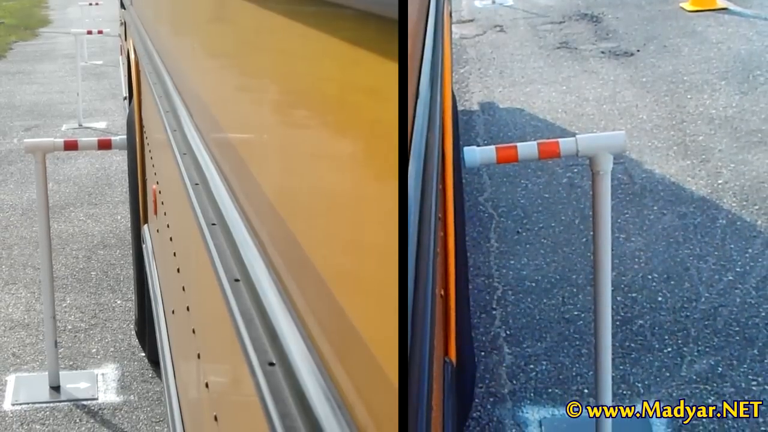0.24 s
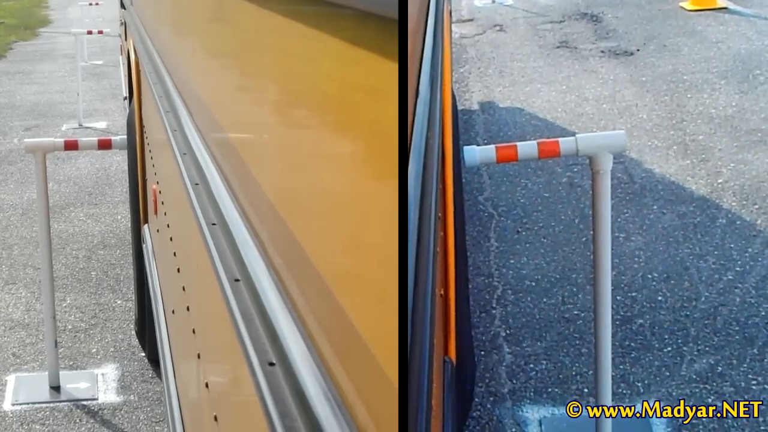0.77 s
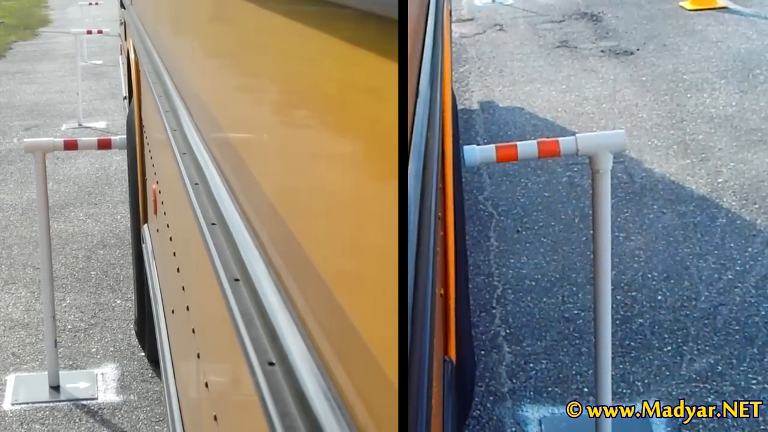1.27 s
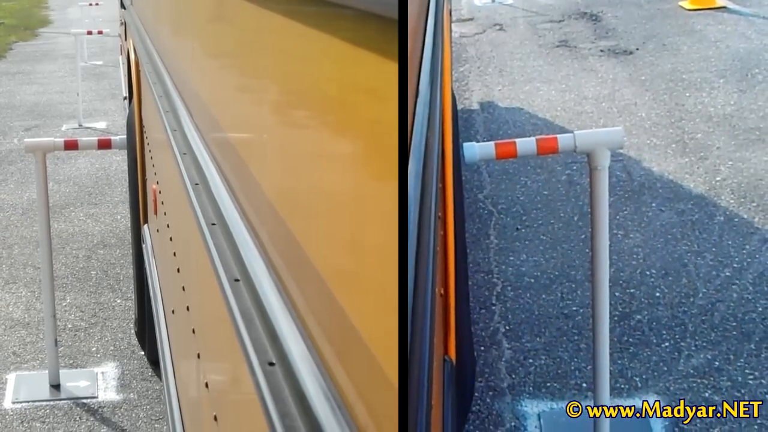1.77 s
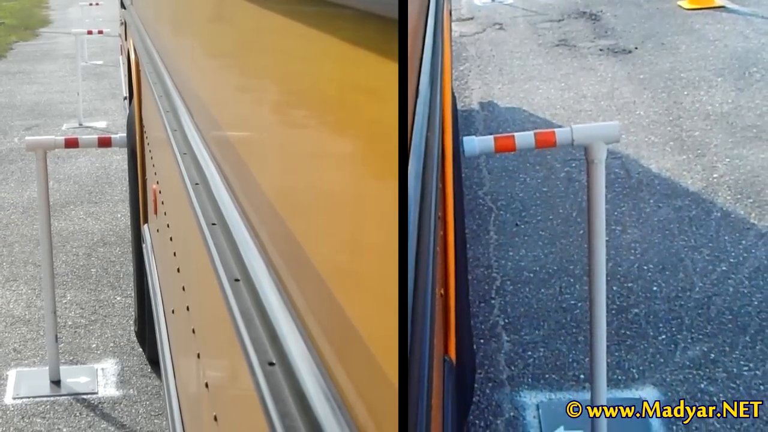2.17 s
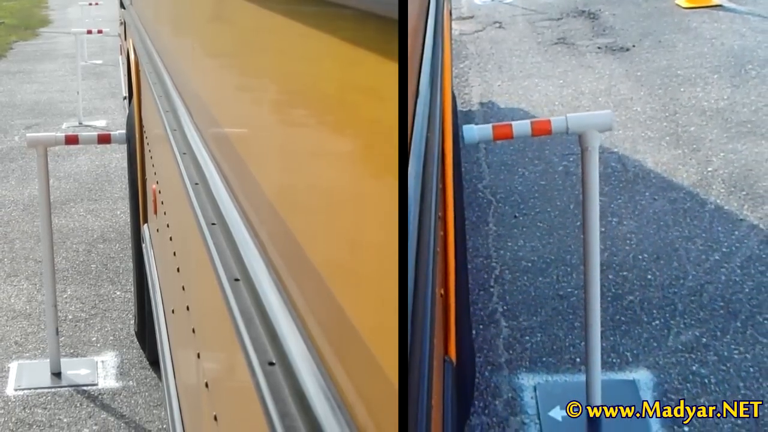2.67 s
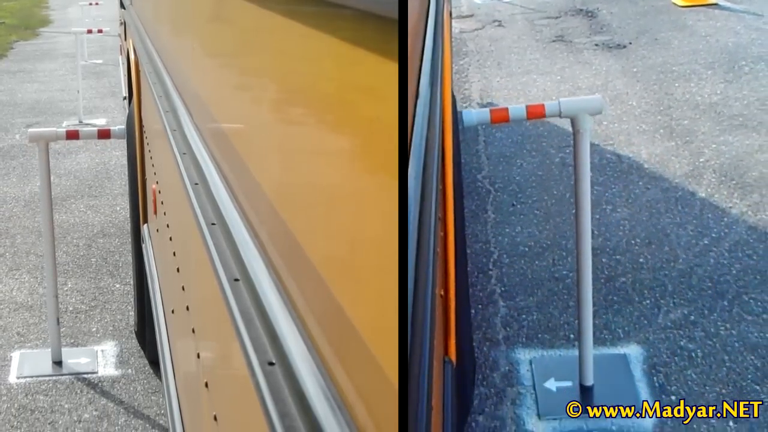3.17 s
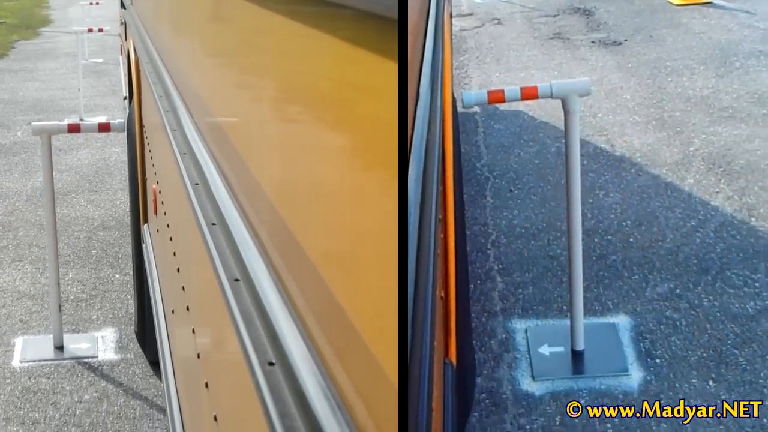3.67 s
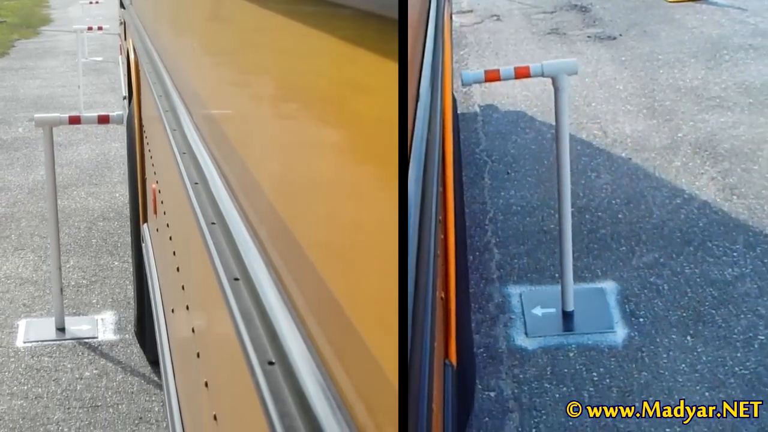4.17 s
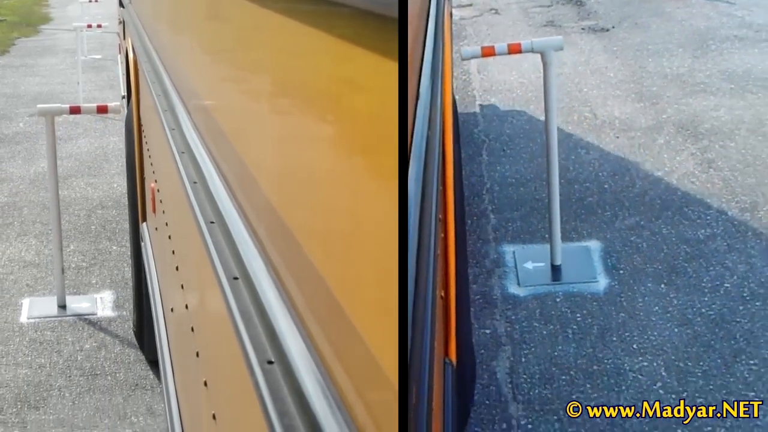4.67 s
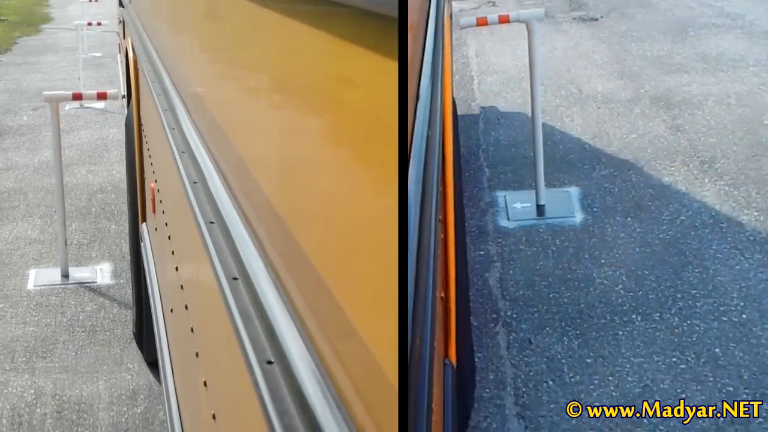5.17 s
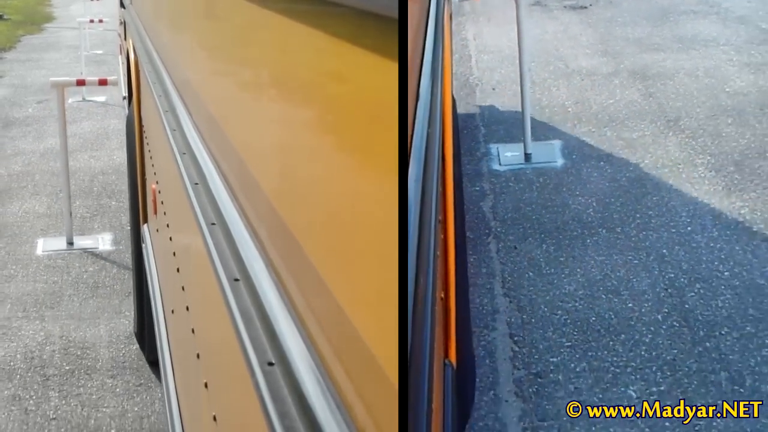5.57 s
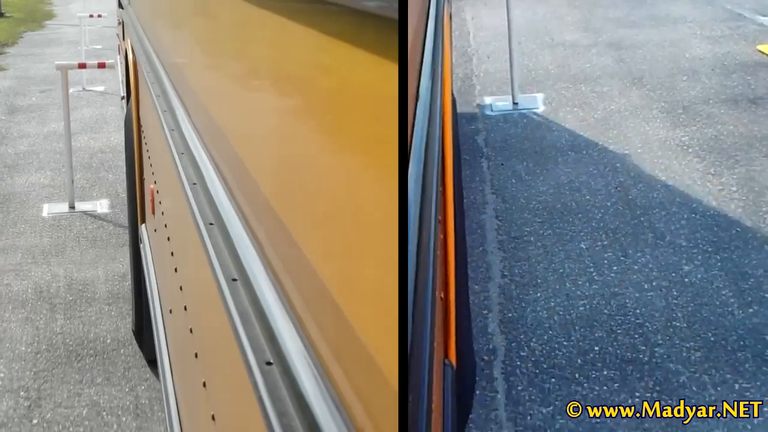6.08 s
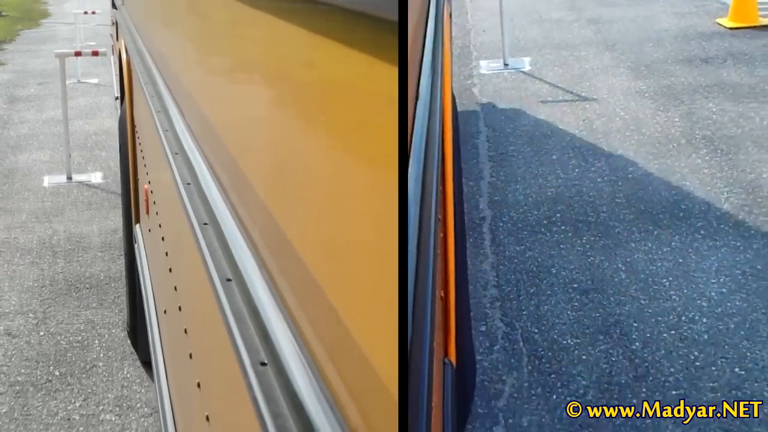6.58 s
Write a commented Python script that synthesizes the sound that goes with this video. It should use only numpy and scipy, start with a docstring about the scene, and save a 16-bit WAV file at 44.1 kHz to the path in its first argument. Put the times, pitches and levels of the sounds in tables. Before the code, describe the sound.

A bus diesel idles with a knocking clatter, its two-tone horn toots four times, air puffs, then the engine revs with a roar.

```python
"""A diesel school bus idles and knocks, gives four toots of its two-tone horn, then revs up with a roar.
Air puffs from the brake valve around the horn's end and again just before the bus pulls slowly forward.
Noise pulsed by the firings makes the engine, with compressor knocks once a turn and hums tied to the crank.
The horns are sums of gliding partials with echoes; turbocharger and brake air are coloured noise.
The recorder ducks the mix at the loud horn and lets it creep back up."""
import sys
import numpy as np
from scipy import signal
from scipy.fft import rfft, irfft
from scipy.io import wavfile
from scipy.ndimage import uniform_filter1d

SR = 44100
rng = np.random.default_rng(int(sys.argv[2]) if len(sys.argv) > 2 else 0)


def wav_record(signal):
    """Record a signal, one row per channel, as 16-bit PCM in the file named by sys.argv[1]."""
    frames = np.transpose(np.atleast_2d(signal))
    bounded = np.clip(frames, -1, 1)
    # unit amplitude maps onto the largest positive 16-bit level
    quanta = np.round(bounded * 32767).astype(np.int16)
    wavfile.write(sys.argv[1], SR, quanta)


N = 301203
T = np.arange(N) / SR
HZ = np.fft.rfftfreq(N, 1 / SR)

# crank speed: (time [s], speed [multiple of idle])
CRANK_SPEED = [(4.45, 1.0), (4.73, 1.44), (5.0, 1.6), (5.35, 1.63), (5.5, 1.54), (5.88, 1.21), (6.83, 1.22)]
# accelerator pushes: (press [s], release [s], depth before the pedal lag [0-1])
PEDAL_PUSHES = [(4.477, 5.393, 0.88), (6.12, 6.634, 0.83)]
# engine noise at idle: (frequency [Hz], relative level [dB per Hz])
IDLE_ROAR_COLOUR = [(50, -24.5), (110, -14.5), (180, -6), (230, -1.5), (300, -2), (400, -3.5), (540, -7.5),
                    (820, -7.5), (1300, -14), (1700, -22), (2200, -27), (2700, -36), (4000, -50.5),
                    (9000, -64.5)]
# engine roar under load: (frequency [Hz], relative level [dB per Hz])
LOAD_ROAR_COLOUR = [(50, -23), (95, -17), (135, 1), (190, -4), (260, -1), (390, -1), (480, -4.5), (820, -6),
                    (1300, -17.5), (2000, -31.5), (2700, -42.5), (4000, -47), (9000, -62)]
# hiss of the engine bay: (frequency [Hz], relative level [dB per Hz])
BAY_HISS_COLOUR = [(1500, -8.5), (2800, 2.5), (4800, 3), (6200, -6), (9500, -9), (12000, -12.5),
                   (15500, -16.5)]
# low rumble of exhaust and air round the body: (frequency [Hz], relative level [dB per Hz])
RUMBLE_COLOUR = [(22, -20.5), (45, -5.5), (62, -2.5), (85, 6), (105, 8), (130, 4), (170, 2.5), (300, -33.5),
                 (3000, -110)]
# turbocharger air: (frequency [Hz], relative level [dB per Hz])
TURBO_COLOUR = [(3000, -13.5), (5400, 1.5), (7000, -2), (10000, -8), (11700, -1), (13000, -16),
                (15500, -21)]
# brake air: (frequency [Hz], relative level [dB per Hz])
BRAKE_AIR_COLOUR = [(1000, -2), (2200, 5), (4500, 1), (6500, 0), (7800, -5), (9500, -2), (12000, -1),
                    (15500, -10)]
# base strength of the three firings in a turn: (level [dB])
FIRING_STRENGTHS = [-2, 2, -1]
# body panel resonances: (frequency [Hz], width [Hz], boost [dB])
PANEL_RESONANCES = [(224, 29, 3), (361, 16, 3.5), (553, 12, 3), (796, 3.6, 7)]
# brake valve puffs: (open [s], time open [s], level [dB])
BRAKE_PUFFS = [(1.205, 0.087, -42), (1.275, .065, -38.5), (4.085, .055, -36.5)]
# horn button, the third toot with a faint first touch: (press [s], release [s], level [dB])
HORN_PRESSES = [(0.284, 0.483, 1.4), (0.817, 0.881, -1.17), (1.03, 1.042, -15), (1.045, 1.083, -4.5),
                (1.401, 1.48, -1.02)]
# low horn partials: (multiple of pitch, level before sag [dB], extra while starting [dB])
LOW_HORN_PARTIALS = [(1, -7, 4), (1.99, -6, 2), (3, -24.5, 0), (4, -7.5, -14), (5.1, -15.5, -17),
                     (5.9, -32, 1), (6.9, -41.5, -1.5), (8, -46, -1), (10.05, -54.5, 0), (12, -56, -6),
                     (14, -60.5, 8), (16, -58, 6), (21.8, -62.5, 2.5), (35, -68, 5)]
# high horn partials: (multiple of pitch, level before sag [dB], extra while starting [dB])
HIGH_HORN_PARTIALS = [(1, -11.5, 11.5), (2, 0, 2.5), (2.9, -7, 4), (4.04, -10.5, -7.5), (5.07, -26.5, -5.5),
                      (6, -40.5, 3.5), (7, -40, -5.5), (8, -45, 6.5), (9, -43, -1), (10, -45.5, -7.5),
                      (12, -53, 6), (13, -51.5, -4), (17, -55, 3), (21, -63, 6.5), (28.8, -66.5, -8)]
# ring of the yard: (frequency [Hz], time to fall 60 dB [s])
YARD_DECAY = [(400, 0.25), (1000, 0.31), (2000, 0.25), (8000, 0.3)]
# noise the microphones do not share: (frequency [Hz], level against the shared part [dB])
UNSHARED_NOISE = [(25, -2), (45, -8), (80, -15), (150, -20), (300, -24), (1000, -23), (2000, -13),
                  (3000, -2), (6000, 0), (12000, 1)]
# stereo balance: (frequency [Hz], left over right [dB])
STEREO_BALANCE = [(100, -.4), (700, -.5), (1100, -.3), (2200, -3), (4500, 0), (12000, 1.1)]

IDLE_HZ = 13.35  # crank turns a second
EDGE_HZ = 15850  # upper band limit of the recorder
PEDAL_LAG_S = 0.063
# revs here are crank speed above idle, in multiples of idle
IDLE_DB, DB_PER_REV, PEDAL_DB = -18.5, 7, 2.5
# the gearbox takes up the load over the first revs
FULL_LOAD, TAKE_UP_REVS, TAKE_UP_S = 0.79, 0.22, 0.07
# the rumble thins with revs, and swells when the pedal makes the engine labour at low revs
RUMBLE_DB, RUMBLE_DB_PER_REV = -25, -4.5
LABOUR_DB, LABOUR_REVS, LABOUR_WIDTH = 7.5, 0.27, 0.17
# the turbocharger rushes above a threshold of revs and grows as it spools up
TURBO_DB, TURBO_FROM_REVS, TURBO_KNEE_REVS = -58.5, 0.32, 0.05
SPOOL_S, SPOOL_DB_PER_REV = 0.55, 12.5
PUFF_RISE_S, PUFF_FADE_DB_PER_S = 0.034, 130
HORN_SAG_DB_PER_S = 26


def gain_of(db):
    """Decibels to amplitude."""
    return 10 ** (np.asarray(db) / 20)


def evened(x):
    """Scales to an rms of 1."""
    return x / np.sqrt(np.mean(x ** 2) + 1e-20)


def curve(rows):
    """A control at every sample, drawn straight between its points."""
    return np.interp(T, *np.transpose(rows))


def read(points, hz):
    """A spectrum table read on a log-frequency axis."""
    f, value = np.transpose(points)
    return np.interp(np.log(hz + 1), np.log(f + 1), value)


def drift(hz):
    """Random wander of rms 1, mostly slower than hz."""
    return evened(irfft(rfft(rng.standard_normal(N)) * np.exp(-(HZ / hz) ** 2), N))


def lagged(x, seconds):
    """Follows a control with inertia."""
    r = np.exp(-1 / (seconds * SR))
    return signal.lfilter([1 - r], [1, -r], x)


def delayed(x, seconds):
    """The same sound a little later; the delay may vary with frequency."""
    return irfft(rfft(x) * np.exp(-2j * np.pi * HZ * seconds), N)


def panels(hz):
    """Gain of the bus body at a frequency: each panel booms near its resonance."""
    boost_db = sum(db / (1 + ((hz - f) / width) ** 2) for f, width, db in PANEL_RESONANCES)
    return gain_of(boost_db)


def noise(spectrum, drive=1):
    """Turbulence, pulsed by drive and coloured by the body, as the two microphones hear it."""
    mid, side = rfft(rng.standard_normal((2, N)) * drive)
    side = side * gain_of(read(UNSHARED_NOISE, HZ))
    colour = gain_of(read(spectrum, HZ)) * panels(HZ)
    return evened(irfft(np.array([mid + side, mid - side]) * colour, N))


def stroke(cycles, rise, fall):
    """A quick rise and slower fall in every cycle; rise and fall are in cycles."""
    age = cycles % 1
    return evened((1 - np.exp(-age / rise)) * np.exp(-age / fall))


def ticks(turns, at, ring_hz, width_hz, fall):
    """One dull metallic knock a turn: a decaying noise burst through a resonance; at and fall in turns."""
    burst = rng.standard_normal(N) * np.exp(-((turns - at) % 1) / fall)
    b, a = signal.iirpeak(ring_hz, ring_hz / width_hz, fs=SR)
    once = signal.lfilter(b, a, burst)
    return evened(signal.lfilter(b, a, once))


def crank():
    """Crank speed in turns a second, and the turns made so far."""
    speed = IDLE_HZ * curve(CRANK_SPEED) / CRANK_SPEED[0][1]
    return speed, np.cumsum(speed) / SR


def driving():
    """Revs above idle, the push on the pedal, and the load (0-1) that the gearbox takes up."""
    revs = curve(CRANK_SPEED) / CRANK_SPEED[0][1] - 1
    push = sum(depth * ((T >= press) & (T < release)) for press, release, depth in PEDAL_PUSHES)
    load = lagged(FULL_LOAD * np.tanh(revs / TAKE_UP_REVS), TAKE_UP_S)
    return revs, lagged(push, PEDAL_LAG_S), np.clip(load, 0, 1)


def yard(x):
    """Scattered echoes from asphalt and buildings, each band dying at its own speed."""
    taps = rng.standard_normal((2, SR)) * (rng.random(SR) < 0.05)
    # left and right share most of their echoes
    taps[1] = (2 * taps[0] + taps[1]) / np.sqrt(5)
    hz, t, z = signal.stft(taps, SR, nperseg=256)
    decay = gain_of(-60 * t / read(YARD_DECAY, hz)[:, None])
    tail = signal.istft(z * decay * (t > 0.015), SR, nperseg=256)[1]
    return signal.fftconvolve(x[None], tail / np.linalg.norm(tail[0]), axes=1)[:, :N]


def turbocharger():
    """Air rushes through the turbocharger while the revs are high."""
    revs, _, _ = driving()
    blowing = (1 + np.tanh((revs - TURBO_FROM_REVS) / TURBO_KNEE_REVS)) / 2
    spool_db = SPOOL_DB_PER_REV * lagged(revs, SPOOL_S)
    return noise(TURBO_COLOUR) * blowing * gain_of(TURBO_DB + spool_db)


def brake_air():
    """Each puff swells as the valve opens, holds, and fades once it shuts."""
    flow = np.zeros(N)
    for start, length, db in BRAKE_PUFFS:
        age = T - start
        fade_db = PUFF_FADE_DB_PER_S * np.maximum(age - length, 0)
        flow += np.clip(age / PUFF_RISE_S, 0, 1) * gain_of(db - fade_db)
    return noise(BRAKE_AIR_COLOUR) * flow


def rumble(revs, pedal):
    """Low turbulence of exhaust and air, swelling as the engine labours."""
    labour = pedal * np.exp(-((revs - LABOUR_REVS) / LABOUR_WIDTH) ** 2)
    return noise(RUMBLE_COLOUR) * gain_of(RUMBLE_DB + RUMBLE_DB_PER_REV * revs + LABOUR_DB * labour)


def belt_pump(speed, turns, load):
    """A belt-driven pump hums in step with the crank and booms where it meets a panel."""
    belt = 11.25  # hum cycles a crank turn
    phase = 2 * np.pi * belt * turns + 0.2 * drift(hz=3)
    hum_db = -4.5 - 10 * load + 1.0 * drift(hz=1)
    overtone_db = -17.5 + 1.1 * load + 4.0 * drift(hz=3)
    hum = np.sin(phase) * panels(belt * speed) * gain_of(hum_db)
    overtone = np.sin(2 * phase) * panels(2 * belt * speed) * gain_of(overtone_db)
    return hum + overtone


def exhaust_throb(turns, load):
    """The exhaust throbs at the firing rate, most at idle."""
    return np.sin(2 * np.pi * 3 * turns) * gain_of(-13.5 - 12 * load + 1.0 * drift(hz=6))


def firing_knocks(turns):
    """Three firings a turn knock the block, each with its own strength."""
    firings = 3 * turns + 0.4
    count = firings.astype(int)
    chance_db = 2 * rng.uniform(-1, 1, N)[count]
    strength = gain_of(np.array(FIRING_STRENGTHS)[count % len(FIRING_STRENGTHS)] + chance_db)
    return strength * stroke(firings, rise=0.07, fall=0.55)


def engine_roar(knocks, load):
    """Combustion noise pulsed by the knocks, crossfading from idle to load colour."""
    # the level flutters quickly and irregularly, giving a rough clatter
    drive = (1 + 0.082 * knocks) * gain_of(1.0 * drift(hz=118))
    idle, loaded = noise(IDLE_ROAR_COLOUR, drive), noise(LOAD_ROAR_COLOUR, drive)
    return gain_of(0.02) * (np.sqrt(1 - load) * idle + np.sqrt(load) * loaded)


def bay_hiss(turns, knocks, load):
    """Engine-bay hiss, chuffed once a turn by the air compressor and nudged by the knocks."""
    chuff = stroke(turns - 0.21, rise=0.1, fall=0.75)
    breeze = 1 + 1.4 * (1 - 0.5 * load) * chuff + 0.1 * knocks
    return noise(BAY_HISS_COLOUR, breeze) * gain_of(-31.5 - 1.7 * load)


def compressor_ticks(turns, load):
    """A short tick and a broader clack once a turn, both sinking under load."""
    tick = ticks(turns, at=0.36, ring_hz=1970, width_hz=260, fall=0.06)
    clack = ticks(turns, at=0.27, ring_hz=1280, width_hz=640, fall=0.31)
    return tick * gain_of(-29.5 - 13 * load) + clack * gain_of(-23.0 - 9.4 * load)


def engine():
    """Roar, hiss, knocks and hums locked to the crank, louder with revs and pedal, over the rumble."""
    speed, turns = crank()
    revs, pedal, load = driving()
    effort = gain_of(IDLE_DB + DB_PER_REV * revs + PEDAL_DB * pedal)
    knocks = firing_knocks(turns)
    air = engine_roar(knocks, load) + bay_hiss(turns, knocks, load)
    tones = exhaust_throb(turns, load) + belt_pump(speed, turns, load)
    return effort * (air + compressor_ticks(turns, load) + tones) + rumble(revs, pedal)


def horn(partials, pitch_hz, flat, settle, droop, start, build, stop,
         ring_db, ring_time, bell_hz, bell_width, bell_db):
    """A buzzing diaphragm starts flat and dull, settles, and rings on briefly in its trumpet.

    flat and droop are fractions of the pitch; settle, start, build, stop and ring_time are seconds."""
    out = np.zeros(N)
    k = np.arange(1, int(EDGE_HZ / pitch_hz))[:, None]
    multiple, *columns = np.transpose(partials)
    settled_db, extra_db = (np.interp(k, multiple, column) for column in columns)
    shift = rng.uniform(0, 2 * np.pi, k.shape)
    for press, release, db in HORN_PRESSES:
        span = (T >= press) & (T < release + 0.25)
        age, after = T[span] - press, np.maximum(T[span] - release, 0)
        hz = pitch_hz * (1 - flat * np.exp(-age / settle) - droop * (1 - np.exp(-after / 0.005)))
        hz = hz * (1 + 0.0023 * drift(hz=60)[span])
        # upper partials build up later; the first swings are mostly fundamental
        swell = 1 - np.exp(-(age / (build * k ** 0.43)) ** 2)
        start_db = extra_db * np.exp(-(age / start) ** 2)
        # a partial flares or dips as it glides through a peak or notch of the bell
        flare_db = bell_db * np.exp(-((k * hz - bell_hz) / bell_width) ** 2)
        driven = np.exp(-(after / stop) ** 2)
        # mostly the lowest partials ring on
        ringing = gain_of(ring_db) * np.exp(-after / ring_time) / (1 + (k / 2.1) ** 8)
        dying = driven * gain_of(flare_db) + (1 - driven) * ringing
        # each partial wavers in level at its own rate, as reflections around the bus change
        waver_turns = rng.uniform(10.3, 19.3, k.shape) * age + rng.random(k.shape)
        waver_db = np.sin(2 * np.pi * waver_turns) * np.minimum(0.35 * k, 2.5)
        level_db = db - HORN_SAG_DB_PER_S * age + settled_db + start_db + waver_db
        wave = np.sin(2 * np.pi * k * np.cumsum(hz) / SR + shift)
        out[span] += (gain_of(level_db) * swell * dying * wave).sum(0)
    return out


def horns():
    """Two horns about a minor third apart, the low bell with a peak and the high bell with a notch."""
    low = horn(LOW_HORN_PARTIALS, pitch_hz=430.9, flat=0.052, settle=0.024, droop=0.0087,
               start=0.048, build=0.0029, stop=0.014, ring_db=-19.5, ring_time=0.023,
               bell_hz=1277.6, bell_width=13.4, bell_db=21)
    high = horn(HIGH_HORN_PARTIALS, pitch_hz=519.6, flat=0.059, settle=0.012, droop=0.00092,
                start=0.026, build=0.0084, stop=0.0088, ring_db=4, ring_time=0.055,
                bell_hz=1028, bell_width=5, bell_db=-16.5)
    return low + high


def scene():
    """Engine, turbocharger, brake air, and horns with a slap from a nearby wall and the ring of the yard."""
    toots = horns()
    slap = delayed(toots, seconds=0.036)
    # the horns beam their treble at the wall, so the slap is brighter than the direct sound
    bright = signal.sosfilt(signal.butter(2, 4800, "high", fs=SR, output="sos"), slap)
    echoes = gain_of(-16) * slap + gain_of(0.5) * bright + gain_of(-17) * yard(toots)
    return engine() + turbocharger() + toots + echoes + brake_air()


def gain_control(x, limit_db, attack, recover_db):
    """Listens above the bass, turns down quickly over the limit and recovers by recover_db a second."""
    heard = signal.sosfilt(signal.butter(2, 400, "high", fs=SR, output="sos"), x)
    power = uniform_filter1d((heard ** 2).mean(0), size=700)
    power_db = 10 * np.log10(abs(power) + 1e-12)
    # a running peak on a rising ramp is a peak hold that falls at a steady rate
    fall = T * recover_db
    over_db = np.maximum.accumulate(np.maximum(power_db - limit_db, 0) + fall) - fall
    return x / gain_of(lagged(over_db, attack))


def record(dry):
    """Two close microphones, a treble notch, gain control, a faint whistle, overload and the band limit."""
    whistle_hz, whistle_db, notch_hz, lag_s = 15734, -74, 7850, 1.8 / SR
    # bass and middle reach the left microphone later; the treble comes from all round
    left = delayed(dry[0], lag_s / (1 + (HZ / 4000) ** 4))
    pair = np.array([left, dry[1]])
    balance_db = np.outer([0.5, -0.5], read(STEREO_BALANCE, HZ))
    pair = irfft(rfft(pair) * gain_of(balance_db), N)
    pair = signal.lfilter(*signal.iirnotch(notch_hz, 1.8, fs=SR), pair)
    x = gain_control(pair, limit_db=-10.5, attack=0.006, recover_db=5.5)
    whistle = gain_of(whistle_db) * np.sin(2 * np.pi * whistle_hz * T)
    x = np.clip(x + whistle, -1, 1)
    band_limit = signal.firwin(1023, EDGE_HZ, window=("kaiser", 9), fs=SR)
    return signal.oaconvolve(x, band_limit[None], "same")


dry = scene()
out = record(dry)
wav_record(out)
```